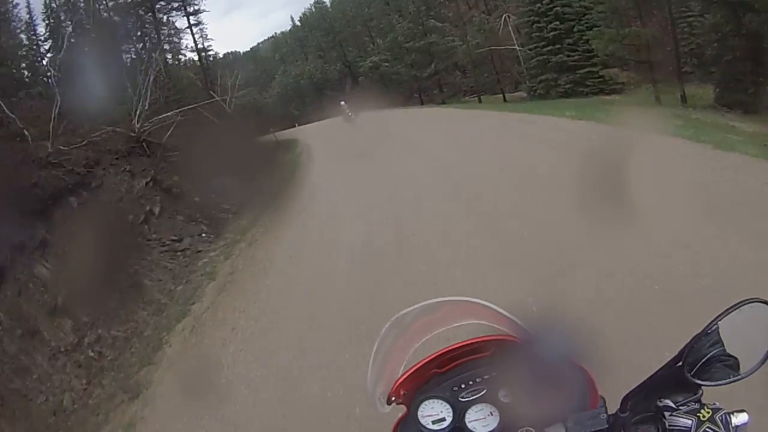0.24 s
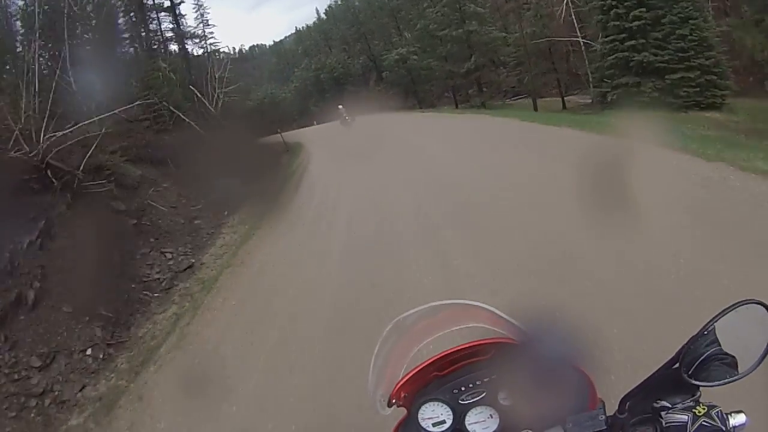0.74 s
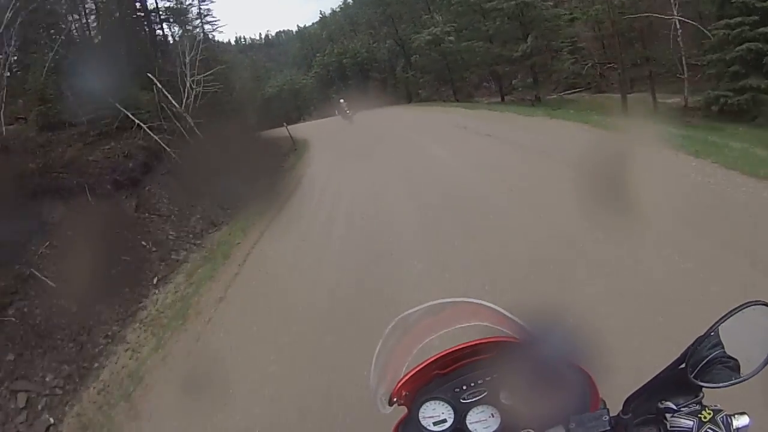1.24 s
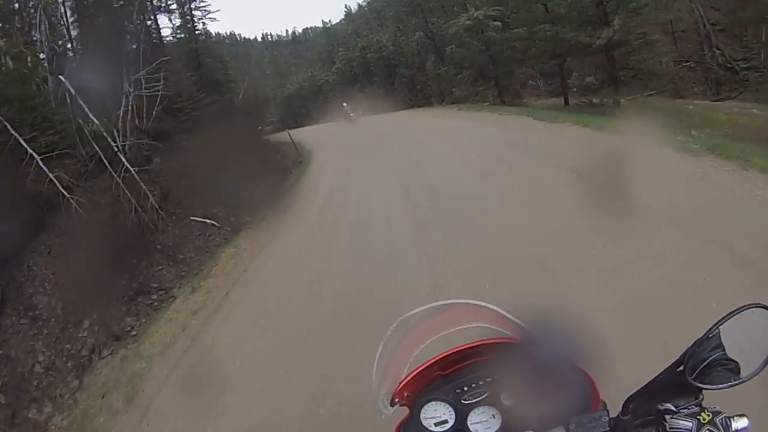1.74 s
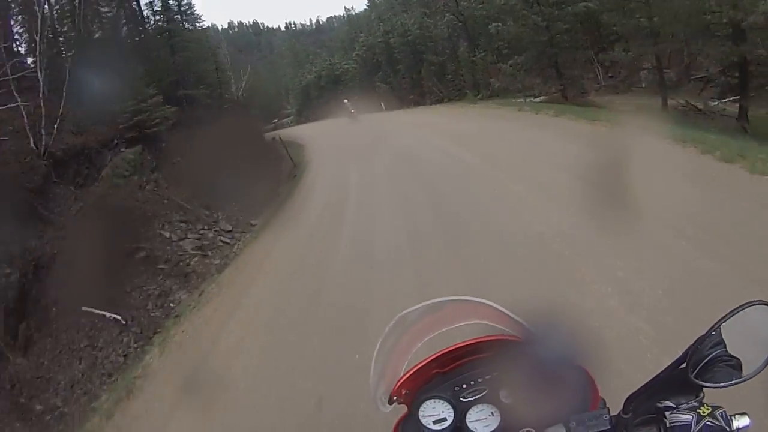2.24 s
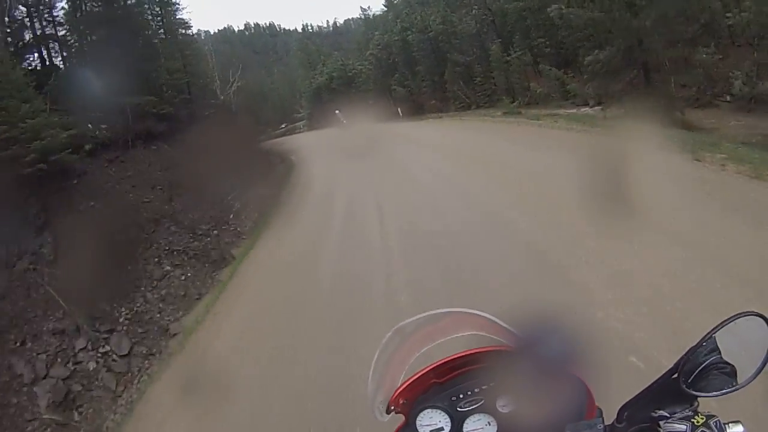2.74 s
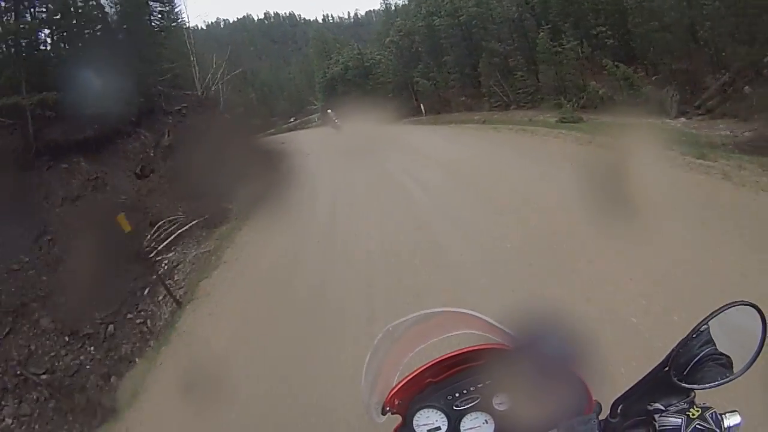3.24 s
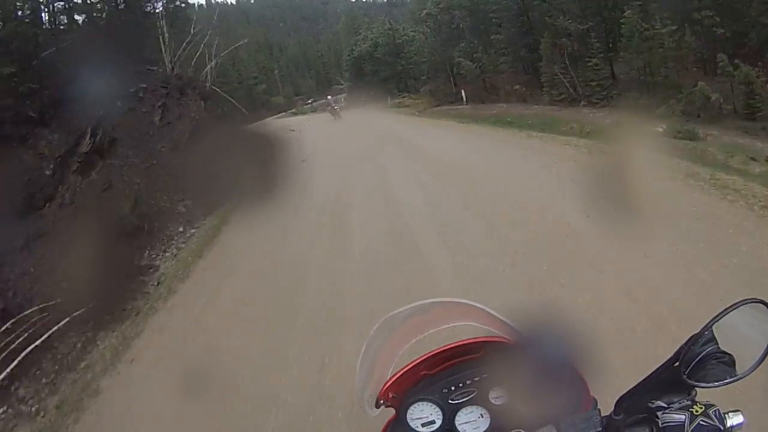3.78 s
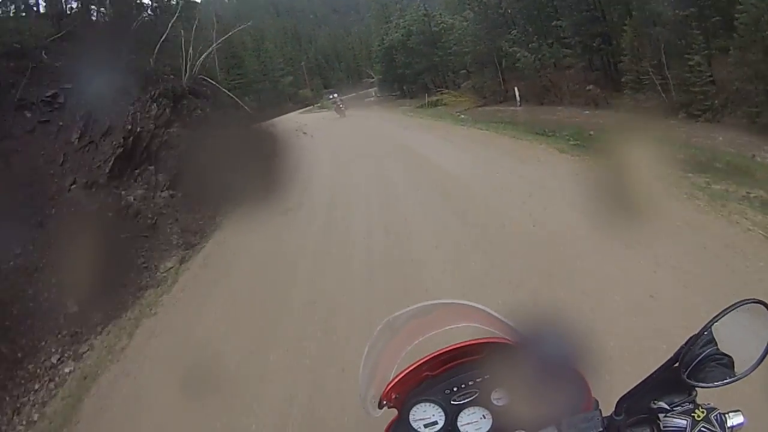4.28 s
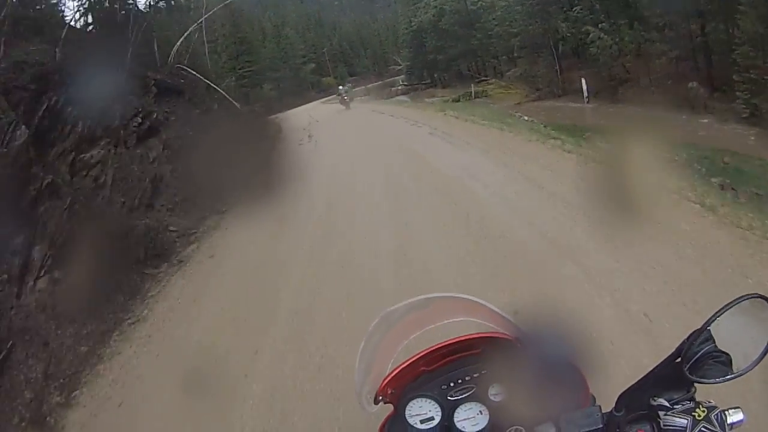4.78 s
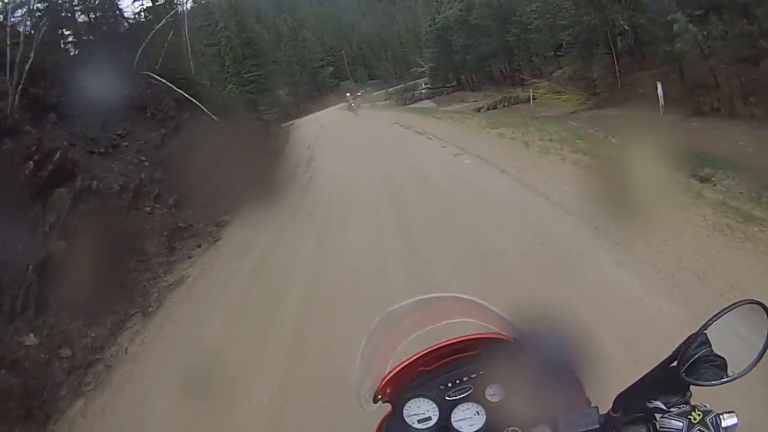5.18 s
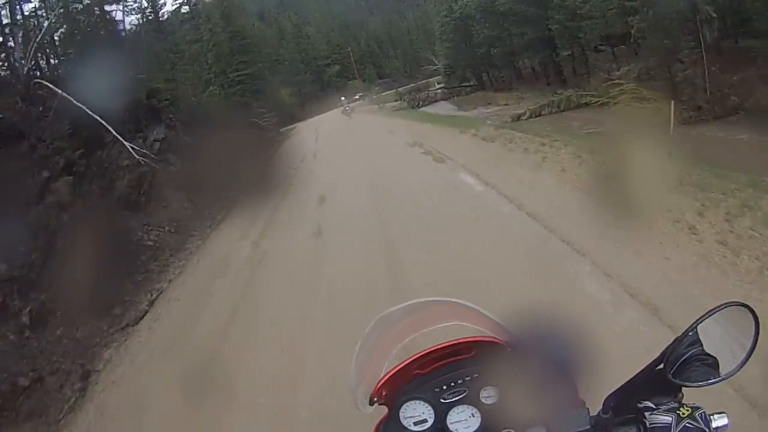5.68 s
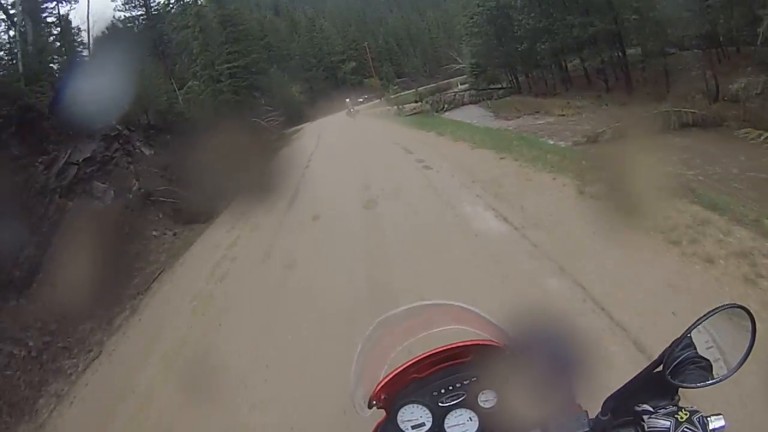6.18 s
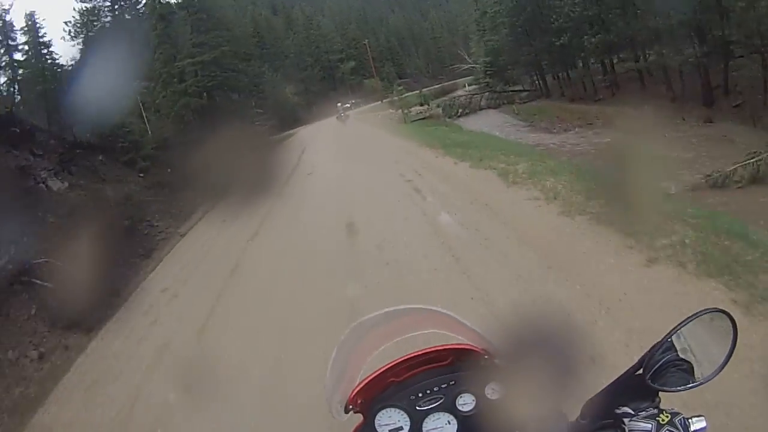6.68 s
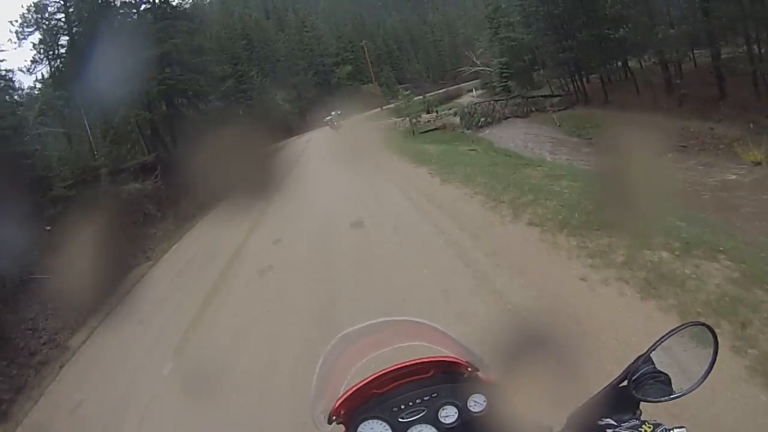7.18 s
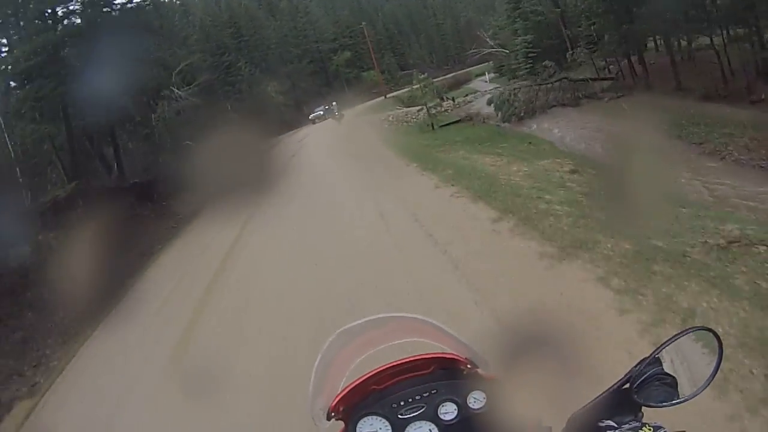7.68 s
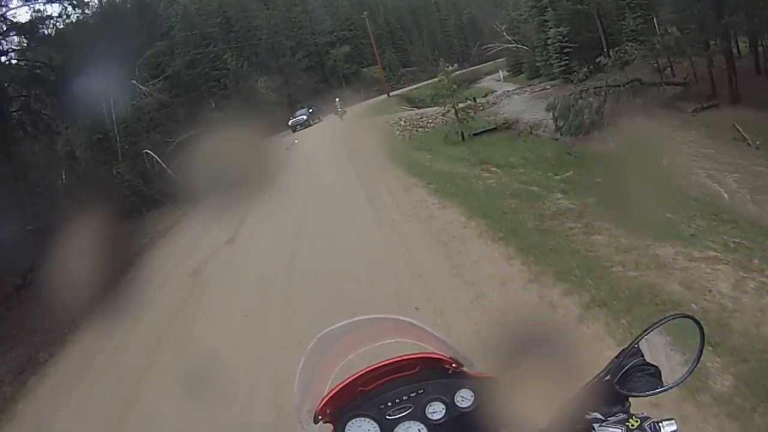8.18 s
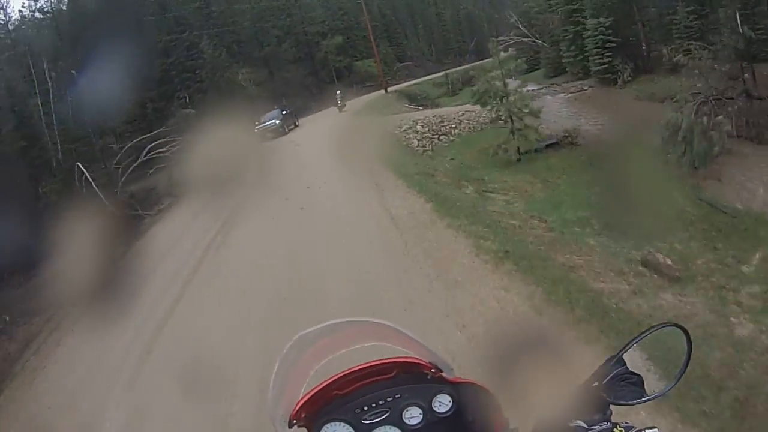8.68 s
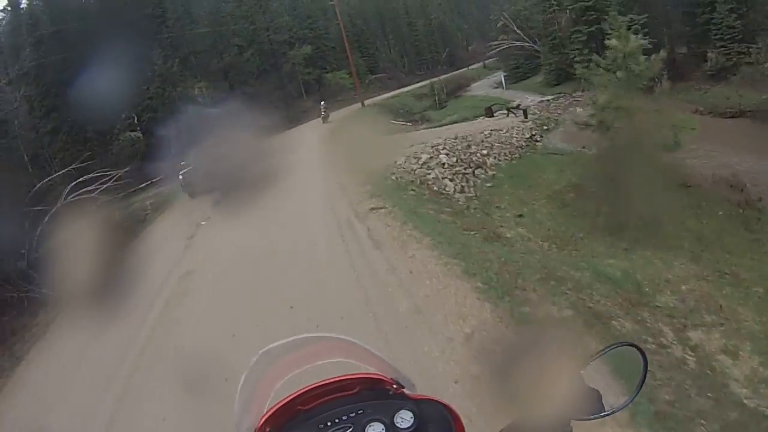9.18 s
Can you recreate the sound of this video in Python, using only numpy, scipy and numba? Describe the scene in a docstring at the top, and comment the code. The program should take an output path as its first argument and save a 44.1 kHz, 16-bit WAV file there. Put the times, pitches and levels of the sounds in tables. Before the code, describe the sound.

A motorcycle rides along a gravel road, heard from a microphone in a closed housing on the rider's helmet. Wind buffets in deep, uneven throbs beneath a hollow, fluttering rush and hiss. The engine hums at one pitch, swelling briefly again and again over the road rumble. A sharp tick strikes the housing early on and a few weaker ones follow, with faint metallic buzzes and pattering grit.

```python
"""On a gravel road, heard from a camera in a closed housing on a motorcyclist's helmet.
Air buffets the helmet in a low throb and the engine hums through body and shell. Wind and tyre roar
ring the housing's resonances, and the road shakes the frame. A loose part chirrs now and then,
a few stones or drops tick on the shell, and fine grit patters."""
import sys
import numpy as np
from scipy import signal
from scipy.io import wavfile
from scipy.ndimage import uniform_filter1d
from numba import njit

SR = 44100
rng = np.random.default_rng(int(sys.argv[2]) if len(sys.argv) > 2 else 0)


def materialize(psi):
    """Save the field psi as 16-bit PCM at rate SR to the path in sys.argv[1].

    A 1-D psi becomes a single channel; in a 2-D psi each row is a channel.
    """
    bounded = np.clip(np.atleast_2d(psi).T, -1, 1)
    quanta = np.round(bounded * 32767).astype(np.int16)
    wavfile.write(sys.argv[1], SR, quanta)


N = 415863

# Strongest air thumps. Each row: centre in seconds, peak in dB, pitch in Hz, half-length in ms.
THUMPS = [(0.116, -29, 50.9, 35), (0.27, -21.5, 55.5, 20), (0.48, -26, 49.7, 21), (0.645, -23, 51, 18),
          (0.8, -26, 51.4, 39), (0.968, -27, 50.2, 23.5), (1.22, -21.5, 47.7, 34), (1.413, -22, 55.6, 36),
          (1.61, -26, 49.9, 33), (1.785, -21, 51.9, 29), (1.948, -26.5, 47.8, 45), (2.331, -23, 50.7, 26),
          (2.544, -27, 50.04, 45), (2.881, -26, 51.8, 34.7), (2.998, -26, 53, 20), (3.38, -23, 43.87, 27),
          (3.717, -21, 50.8, 43), (3.837, -23, 50.4, 21), (4.156, -25.5, 51.6, 46),
          (4.63, -24.5, 56.8, 25.5), (4.88, -22, 50.8, 25.4), (4.934, -21.5, 56.3, 16),
          (5.02, -25, 55.35, 18.3), (5.073, -24.5, 55.04, 12.8), (5.184, -23, 45.95, 19),
          (5.249, -20.5, 49, 19.3), (5.33, -26, 49.7, 18), (5.4, -24, 53.8, 17.8), (5.533, -24, 55.7, 20),
          (5.63, -19.5, 49.1, 35), (5.878, -21.5, 47.9, 22.3), (5.952, -26, 51.8, 18.7),
          (6.204, -21.5, 52.9, 19), (6.52, -24, 45.96, 43), (6.737, -24, 46, 23), (6.83, -22, 51, 16.6),
          (6.982, -25, 49.9, 28.7), (7.145, -25, 50, 19), (7.578, -19, 49.9, 20.4), (7.778, -23, 52.94, 38),
          (8.014, -25, 49.9, 22.3), (8.132, -21.5, 48.97, 28.6), (9.093, -19, 49.9, 22.2),
          (9.166, -20, 55.2, 25), (9.236, -23, 53, 20.5)]
# Wind gusts on the shell. Each row: time in seconds, roar in dB, hiss in dB.
GUSTS = [(0, -36, -49.5), (0.95, -36.5, -48.5), (1.17, -37, -50.5), (1.4, -37, -49.5), (1.58, -38.5, -52),
         (1.96, -36.5, -49), (2.3, -37, -50.5), (2.55, -38, -50.5), (2.8, -36.5, -49), (3.0, -37.5, -49),
         (3.7, -39, -52), (4.35, -37.5, -49.5), (4.9, -38.5, -52), (5.45, -37, -49), (5.9, -36.5, -48.5),
         (6.12, -38, -50), (6.4, -36, -50.5), (6.75, -39, -51), (7.2, -36, -48), (7.55, -39, -51),
         (7.72, -36, -48), (7.9, -39, -51), (8.4, -36.5, -51), (8.65, -38.5, -49.5), (8.82, -37, -53),
         (8.97, -40.5, -51.5), (9.2, -36, -49), (9.43, -38, -50.5)]


def buffet():
    """Eddies leave the helmet in short throbs of a wandering low tone."""
    # Running throb. Each row: time in seconds, level in dB.
    throb_levels = [(0, -33), (0.5, -30), (1, -38), (1.6, -34), (2.1, -35), (2.7, -33.5), (3.15, -30),
                    (3.45, -28), (3.9, -33), (4.2, -32), (4.5, -45), (4.9, -34), (5.5, -31), (6.1, -32),
                    (6.8, -27.5), (7.3, -30), (8, -32), (8.6, -31.5), (8.95, -35), (9.43, -31.5)]
    throb_hz = 46.36
    centre_s, peak_db, thump_hz, half_ms = np.transpose(THUMPS)
    shape = bells(centre_s, half_ms)
    running = undb(curves(throb_levels)[0]) * throbbing(rate_hz=20, bias=0.69)
    between = 1 - upsample(shape.max(axis=0))  # a thump takes over from the running throb
    side = (-1) ** np.arange(len(centre_s))  # eddies leave left and right in turn
    gain = between ** 2 * running + upsample(side * undb(peak_db) @ shape)
    offset_hz = upsample((thump_hz - throb_hz) @ shape / np.maximum(shape.sum(axis=0), 1))
    hz = throb_hz + offset_hz + 3.52 * between * walk(4)
    flicker = undb(0.83 * walk(30))
    phase = 2 * np.pi * np.cumsum(hz + 3.03 * walk(25)) / SR
    return np.sqrt(2) * gain * flicker * np.sin(phase)


def beat():
    """A firmer tone just above the throb, probably the crankshaft; it gives way during thumps."""
    # Each row: time in seconds, level in dB.
    levels = [(0, -39), (0.3, -36), (0.6, -35), (1.7, -38.5), (1.95, -44), (2.3, -35.5), (3.1, -38),
              (3.5, -42), (3.8, -33), (4.7, -39.5), (4.95, -35), (5.5, -31), (5.75, -38), (6.4, -35.5),
              (6.7, -32.5), (7.7, -36.5), (8.3, -34.5), (8.7, -40), (8.95, -43), (9.15, -35), (9.43, -40)]
    beat_hz, wander_hz = 61.14, 2.97
    phase = 2 * np.pi * np.cumsum(beat_hz + wander_hz * walk(9)) / SR
    centre_s, _, _, half_ms = np.transpose(THUMPS)
    duck = 1 - 0.7 * upsample(bells(centre_s, half_ms).max(axis=0))
    return np.sqrt(2) * duck * undb(curves(levels)[0] + 3.2 * walk(16)) * np.sin(phase)


def engine():
    """The firing rate wavers with the load; helmet and body pass only it and its octave."""
    # Running hum. Each row: time in seconds, level in dB.
    hum_levels = [(0, -45), (0.6, -42), (1.7, -37), (2.6, -39), (3.2, -41), (3.6, -37.5), (4.1, -46),
                  (5.1, -44), (5.7, -47), (6.4, -41), (6.85, -43.5), (7.5, -38.5), (8.3, -42.5), (9, -40.5),
                  (9.43, -39.5)]
    # Each row: centre in seconds, peak in dB, half-length in ms.
    swells = [(0.07, -30.5, 20), (0.467, -29.5, 40), (0.717, -32.5, 50), (0.878, -34.5, 19),
              (1.088, -37, 28), (1.186, -31.5, 27), (1.383, -30.5, 57), (1.637, -31.5, 32),
              (1.721, -32.5, 24), (1.86, -33, 30), (2.109, -32, 34), (2.395, -30, 21.4), (2.456, -28, 25),
              (2.846, -32, 51), (3.234, -32.5, 26), (4.385, -29.5, 42), (4.567, -32, 40),
              (4.828, -32.5, 29.5), (5.46, -30, 50), (5.653, -34, 35), (6.011, -30.5, 27),
              (6.36, -35.5, 48), (6.524, -34.5, 28), (6.687, -33, 25), (7.315, -34, 28), (7.66, -35, 28.6),
              (8.236, -36, 30), (8.4, -39, 20.5), (8.778, -36, 19.8), (9.354, -34, 41)]
    firing_hz, octave_db = 192.6, -23.5
    centre_s, peak_db, half_ms = np.transpose(swells)
    shape = bells(centre_s, half_ms)
    loose = 1 - upsample(shape.max(axis=0))  # firings even out within a swell
    running = undb(curves(hum_levels)[0]) * throbbing(rate_hz=21, bias=0.64)
    gain = loose ** 2 * running + upsample((undb(peak_db)[:, None] * shape).max(axis=0))
    phase = 2 * np.pi * np.cumsum(firing_hz + (2.485 + 2.49 * loose) * walk(24)) / SR
    uneven = undb(2.8 * loose * walk(40))
    return np.sqrt(2) * gain * uneven * (np.sin(phase) + undb(octave_db) * np.sin(2 * phase))


def wind():
    """Gusts ring the housing; quick eddies flutter all resonances together, the hiss most."""
    # Housing resonances and loudest ring. Each row: centre in Hz, width in Hz, dB re the roar.
    shell_modes = [(1162, 35, -17), (1223, 67, -10.5), (1366, 121, -8), (1517, 110, -9), (1850, 376, -10),
                   (2120, 128, -13.5), (2323, 157, -13.5), (2460, 90, -19), (2637, 250, -20)]
    ring_modes = [(1610, 75, -6), (1693, 60, -9.5)]
    # Housing treble and metallic rasp. Each row: centre in Hz, width in Hz, dB re the hiss.
    treble_modes = [(2804, 280, -7.5), (3296, 590, -6), (3880, 430, -13), (4215, 420, -12),
                    (5670, 1400, -17)]
    rasp_modes = [(4465, 370, -8), (4906, 470, -9)]
    # Steadier top of the airflow. Each row: centre in Hz, width in Hz, level in dB.
    air_modes = [(6300, 580, -79), (6780, 430, -69.5), (7180, 780, -72.5), (7940, 600, -78),
                 (8840, 840, -80.5), (9680, 600, -85), (10940, 2200, -81), (12700, 3400, -84)]
    # Each row: time in seconds, ring gain in dB, rasp gain in dB.
    surges = [(0, 0.5, 2.5), (0.6, 0, 1.5), (1.1, 0.5, 1), (1.6, -0.5, 2), (1.7, 4, -1), (1.78, -4, -2),
              (1.95, 3, 2), (2.33, -4, 3), (2.45, 4, 0.5), (2.56, -2.5, 1.5), (2.8, 3, 2), (2.95, -0.5, 1),
              (3.5, 1, -0.5), (4.1, -1, 0), (4.25, 0, -0.5), (5.55, 1.5, 1.5), (6.14, -1.5, 0),
              (6.2, -1, 2.5), (6.83, -2.5, 0.5), (7.22, -0.5, -0.5), (7.6, -1.5, 1), (7.75, 1.5, 0),
              (7.84, -6, -3), (7.98, 3, 4.5), (8.04, -2.5, -2.5), (8.43, 1, 1), (9.0, -1.5, -4),
              (9.14, 1, -1.5), (9.43, -7, -3)]
    # Each row: centre in seconds, half-length in ms, hiss dip in dB.
    lulls = [(0.83, 25, -3.5), (1.13, 15, -5), (1.272, 20, -1), (1.722, 13.9, -2), (2.667, 19, -3),
             (2.92, 24, -5.5), (3.315, 20, -1.5), (3.578, 14.6, -0.5), (3.72, 18, -0.5), (4.065, 19, -3),
             (4.45, 15.4, -1), (7.0, 20.2, -3)]
    roar_db, hiss_db = curves(GUSTS)
    ring_db, rasp_db = curves(surges)
    centre_s, half_ms, dip_db = np.transpose(lulls)
    lull_db = upsample(dip_db @ bells(centre_s, half_ms))
    eddies = walk(20)
    eddies = unit(eddies - uniform_filter1d(eddies, int(.2 * SR)))  # keep the quick part
    shell = ringing(shell_modes, flicker_db=1.0, rate_hz=8)
    shell += undb(ring_db) * wavering(ring_modes, drift_hz=25.99, rate_hz=22)
    roar = undb(roar_db + 0.56 * lull_db + 0.31 * eddies) * shell
    hiss_gain = undb(hiss_db + lull_db + 0.62 * eddies + 0.67 * walk(13))
    treble = ringing(treble_modes, flicker_db=0.5, rate_hz=14)
    rasp = undb(rasp_db) * ringing(rasp_modes, flicker_db=0.54, rate_hz=18)
    air_gain = undb(0.33 * (hiss_db - hiss_db.mean() + eddies))
    air = air_gain * ringing(air_modes, flicker_db=0.0, rate_hz=11)
    return roar + hiss_gain * (treble + rasp) + air


def road():
    """Gravel shakes frame, helmet and mount; the roar swells along with the wind."""
    # Each row: centre in Hz, width in Hz, level in dB.
    frame_modes = [(31, 5.7, -42), (47.2, 16, -38), (62, 17, -38.5), (93, 48, -48.5), (131.7, 25, -41.5),
                   (167.8, 19, -45.5), (192.5, 23.4, -44), (235.2, 27, -45.5), (258.7, 23.6, -45.5),
                   (302, 42, -52), (384, 53, -50), (461, 55, -52.5), (539, 115, -53.5), (635, 74, -52.5),
                   (696, 40, -52.5), (862, 195, -52.5), (1044, 65, -55)]
    roar_db = curves(GUSTS)[0]
    return undb(1.05 * (roar_db - roar_db.mean())) * ringing(frame_modes, flicker_db=1.12, rate_hz=6)


def ticks():
    """A blow and its short rattle ring the shell; each place struck favours other modes."""
    # Each row: start in seconds, contact decay in ms, then each mode's peak in dB.
    strikes = [(1.4110, 0.93, -17.5, -40, -27, -28, -23, -21.5, -29, -41, -47),
               (1.530, 0.68, -40, -50, -48, -50, -52, -54, -57, -65, -78),
               (2.8658, 0.78, -32, -45, -33, -31.5, -39, -39, -38, -34, -62),
               (4.12, 0.48, -60, -65, -60, -58, -60, -58, -62, -62, -70),
               (5.590, 0.43, -54, -60, -60, -57, -62, -62, -64, -61, -66),
               (7.6477, 0.95, -45, -30, -55, -36, -38, -54, -56, -64, -70),
               (8.806, 0.72, -50, -60, -52, -50, -52, -53, -59, -63, -70),
               (8.955, 0.55, -60, -65, -60, -60, -62, -60, -64, -60, -66)]
    # Each row: centre in Hz, width in Hz.
    shell_modes = [(2300, 1100), (2600, 440), (3300, 760), (4500, 560), (5600, 850), (6600, 750),
                   (7600, 1200), (10900, 1600), (13800, 1500)]
    out = np.zeros(N)
    t = np.arange(int(.06 * SR)) / SR
    for start_s, contact_ms, *peaks_db in strikes:
        contact = np.sign(rng.standard_normal(len(t))) * np.exp(-1000 * t / contact_ms)
        contact[0] = 4.2  # first blow, relative to the rattle
        i = int(start_s * SR)
        for (hz, width_hz), db in zip(shell_modes, peaks_db):
            ring = steep_band(contact, hz, width_hz)
            out[i:i + len(t)] += undb(db) * ring / np.abs(ring).max()
    return out


def chirrs():
    """A loose part buzzes in short metallic bursts that swell and fade."""
    # Each row: start in seconds, length in ms, gain in dB.
    bursts = [(1.150, 24, -49), (2.585, 33, -53), (3.35, 56, -53), (3.595, 35, -51), (6.395, 37, -50),
              (6.945, 23.3, -52), (7.25, 25, -54), (7.702, 37, -48)]
    # Each row: centre in Hz, width in Hz, relative level in dB.
    part_modes = [(4480, 330, 0), (4900, 400, -4.5), (5300, 400, -12)]
    envelope = np.zeros(N)
    for start_s, length_ms, db in bursts:
        i, n = int(start_s * SR), int(length_ms * SR / 1000)
        envelope[i:i + n] = undb(db) * np.sqrt(np.hanning(n))
    return envelope * ringing(part_modes, flicker_db=2.0, rate_hz=90)


def grit():
    """Dust and fine grains patter faintly on the shell."""
    grains_per_s, impulse_db, spread_db = 14, -50, 4.5
    lands = rng.random(N) < grains_per_s / SR
    hits = lands * undb(impulse_db + spread_db * rng.exponential(size=N))
    return steep_band(hits, 6540, 3000) + undb(-10.0) * steep_band(hits, 10800, 4000)


def ringing(modes, flicker_db, rate_hz):
    """Each mode is driven by its own noise and flickers independently."""
    out = 0
    for hz, width_hz, db in modes:
        gain = undb(db + flicker_db * walk(rate_hz))
        out += gain * unit(steep_band(rng.standard_normal(N), hz, 1.47 * width_hz))
    return out


def wavering(modes, drift_hz, rate_hz):
    """Noisy rings whose centres drift together."""
    offset_hz, out = drift_hz * walk(rate_hz), 0
    for hz, width_hz, db in modes:
        phase = 2 * np.pi * np.cumsum(hz + offset_hz) / SR
        ring = walk(1.5 * width_hz) * np.sin(phase) + walk(1.5 * width_hz) * np.cos(phase)
        out += undb(db) * unit(ring)
    return out


def steep_band(x, hz, width_hz):
    """Two band-passes in series, for deep valleys between modes."""
    hz, width_hz = float(hz), float(width_hz)
    return svf(svf(x, hz, width_hz), hz, width_hz)


@njit
def svf(x, hz, width_hz):
    """State-variable band-pass, gain 1 at the centre."""
    y, band_state, low_state = np.empty(len(x)), 0., 0.
    g, damping = np.tan(np.pi * hz / SR), width_hz / hz
    for i in range(len(x)):
        band = (band_state + g * (x[i] - low_state)) / (1 + g * (g + damping))
        band_state = 2 * band - band_state
        low_state += 2 * g * band
        y[i] = damping * band
    return y


def throbbing(rate_hz, bias):
    """A gain with rounded tops that now and then drops through zero."""
    return unit(np.tanh(bias + walk(rate_hz)))


def walk(rate_hz):
    """Random steps, smoothed twice; RMS 1."""
    hold = int(SR / rate_hz)
    steps = np.repeat(rng.standard_normal(N // hold + 1), hold)
    return unit(uniform_filter1d(uniform_filter1d(steps, hold), hold)[:N])


def bells(centres_s, half_ms):
    """One Gaussian per row, one value per 64 samples."""
    t = np.arange(0, N, 64) / SR
    return np.array([np.exp(-.5 * ((t - s) * 1000 / ms) ** 2) for s, ms in zip(centres_s, half_ms)])


def upsample(coarse):
    return np.interp(np.arange(N), np.arange(0, N, 64), coarse)


def curves(table):
    """Columns after the time column, interpolated per sample."""
    times_s, *columns = np.transpose(table)
    return [np.interp(np.arange(N) / SR, times_s, column) for column in columns]


def undb(db):
    return 10 ** (np.asarray(db) / 20)


def unit(x):
    return x / np.sqrt(np.mean(x ** 2))


def scene():
    return (buffet() + beat() + engine() + wind() + road() + ticks() + chirrs() + grit())[None]


def record(dry):
    """The camera cuts the top."""
    cutoff_hz = 15150
    return signal.sosfilt(signal.ellip(8, .2, 70, cutoff_hz, fs=SR, output="sos"), dry)


dry = scene()
out = record(dry)
materialize(out)
```